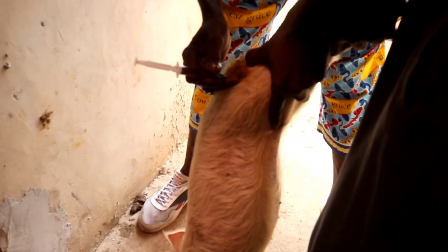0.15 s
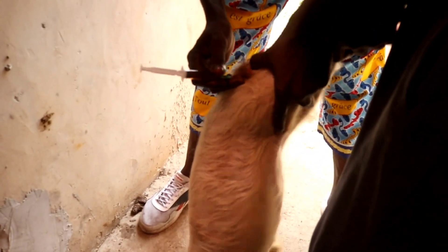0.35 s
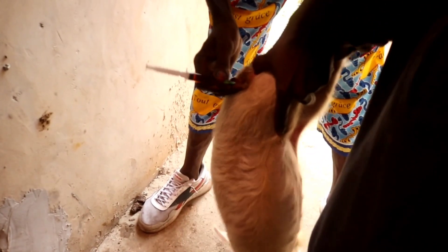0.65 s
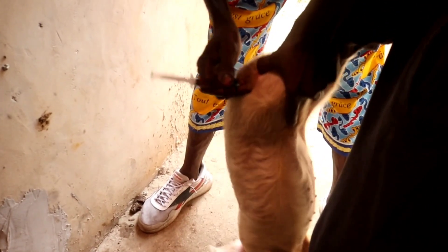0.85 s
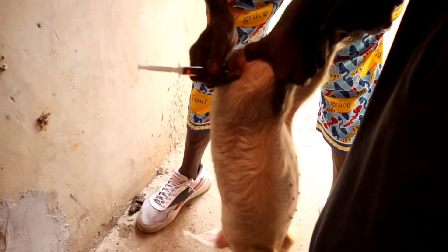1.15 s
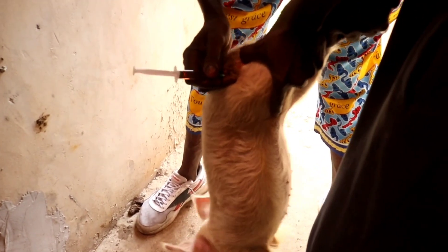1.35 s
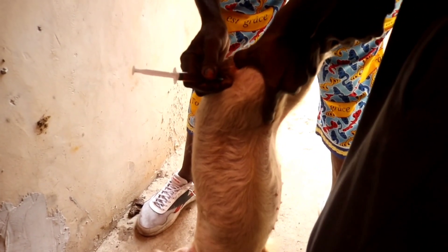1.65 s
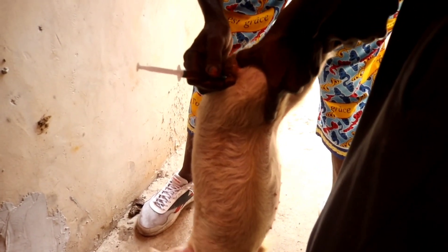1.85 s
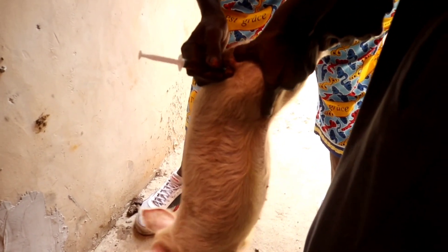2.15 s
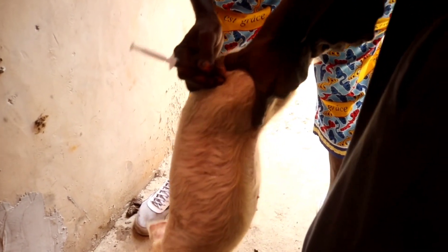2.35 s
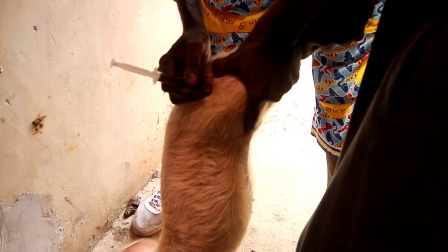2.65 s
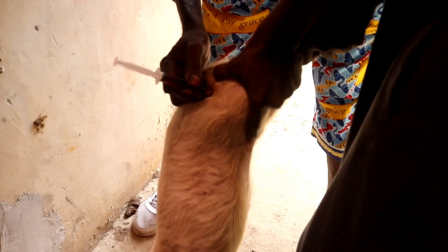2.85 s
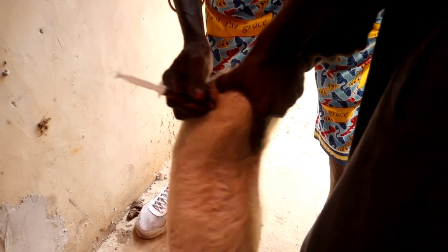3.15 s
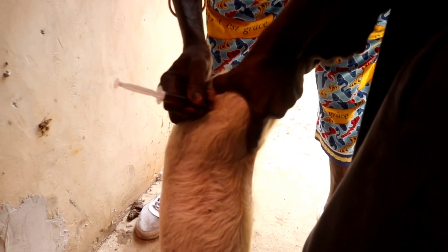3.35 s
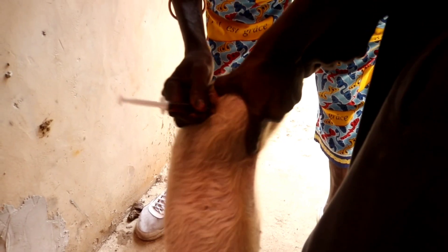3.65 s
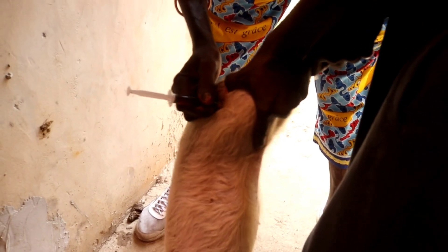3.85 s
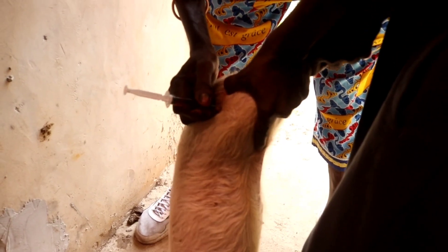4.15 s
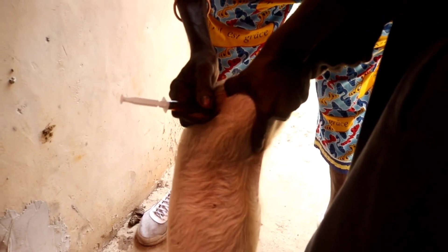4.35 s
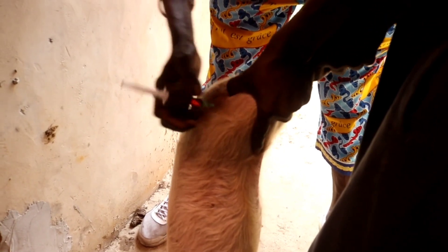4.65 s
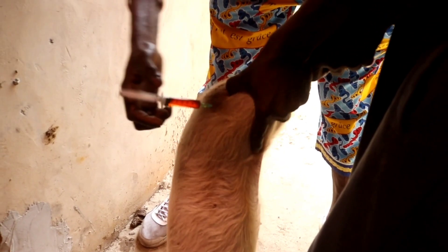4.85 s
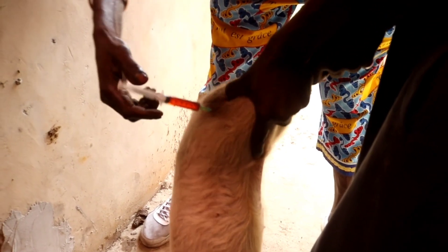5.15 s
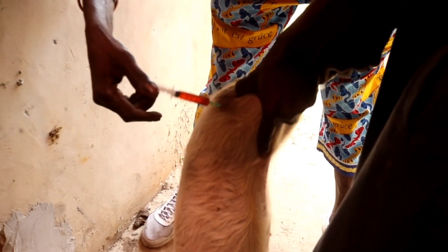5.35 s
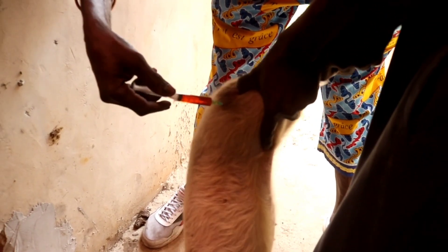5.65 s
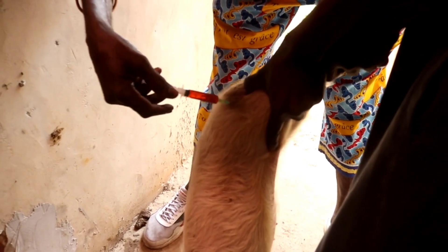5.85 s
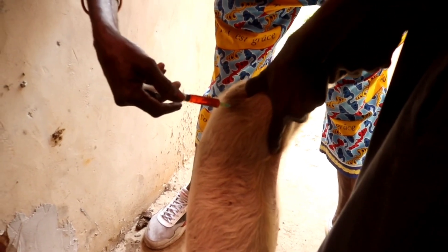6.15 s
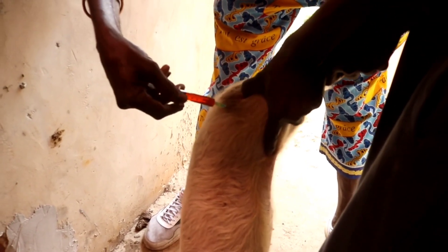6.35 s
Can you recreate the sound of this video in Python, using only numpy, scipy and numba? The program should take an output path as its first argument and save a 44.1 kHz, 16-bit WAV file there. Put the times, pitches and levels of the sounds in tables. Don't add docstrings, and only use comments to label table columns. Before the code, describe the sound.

A piglet is held close to a stereo microphone in a hard, ringing concrete pen with a faint low background. From 0.1 s it barks about four or five times a second, each call roughly a tenth of a second long, raspy with audible throat pulses and opening from a tight mouth to a nasal vowel. Between 0.3 and 1.1 s the calls break into harsh, whistling shrieks that overload and clip. Other pigs answer from further off with dull, rough grunts between calls until about 2.3 s, then only sparsely and faintly. From 1.3 to 3.8 s the barks stay regular but less shrill, slowly spacing out. A soft rising moan comes near 4 s. After that the barks are lower, creakier and about 0.3 to 0.5 s apart. The last, at 6.1 s, trails into a weak falling moan and wall reverberation.

```python
import sys
import numpy as np
from scipy import signal
from scipy.io import wavfile
from scipy.ndimage import uniform_filter1d
from numba import njit

SR = 44100
rng = np.random.default_rng(int(sys.argv[2]) if len(sys.argv) > 2 else 0)


def convert_level_to_amplitude(level_db):
    exponent = np.asarray(level_db, float) / 20
    return 10 ** exponent


def master_out(mix):
    frames = np.transpose(np.atleast_2d(mix))
    ceiling = np.clip(frames, -1, 1)
    pcm = np.round(ceiling * 32767).astype(np.int16)
    wavfile.write(sys.argv[1], SR, pcm)


N = 287077

# (first firm pulse [s], length [s], fastest pulse rate [Hz], push [dB], brightness [dB])
BARK_CALLS = [(0.1228, 0.076, 96, -9.5, -13.5), (0.3289, 0.11, 100, -6, -6.5),
              (0.5454, 0.09, 112, -7, -11.5), (.7733, 0.12, 100, -10, -13.5),
              (1.0202, 0.092, 95, -9.5, -17), (1.2747, 0.087, 92, -11.5, -17),
              (1.5395, .07, 100.7, -9.5, -20), (1.8324, 0.087, 97, -9.5, -17),
              (2.099, 0.088, 88, -14, -15.5), (2.3474, .082, 93, -12, -18.5), (2.6575, 0.082, 85, -11, -18),
              (2.941, 0.087, 97, -11, -17.5), (3.185, .1, 91, -9, -25), (3.502, 0.079, 84, -7, -21),
              (3.7258, .083, 94, -12.5, -25.5), (4.159, 0.095, 79, -13, -10),
              (4.6224, 0.073, 78, -11.5, -16.5), (5.007, 0.059, 77, -14.5, -25),
              (5.3088, 0.083, 72.5, -10.5, -19), (5.634, 0.061, 70.5, -14.5, -14),
              (6.134, 0.092, 69, -12.5, -17.5)]
# (faint leak before it [dB], first pulse [dB], mouth already open [0-1])
BARK_ONSETS = [(-15, -9.5, 0.47), (-22, -9.5, .5), (-58, -5.5, 0.5), (-55, -8, 0.19), (-62, -8.5, .3),
               (-60, -7, 0.12), (-12, -1, .4), (-60, -3.5, 0.76), (-60, -2, 0), (-60, -7, .1),
               (-16.5, -5.5, 0), (-11.5, -3, 0.67), (-60, -7, 0.25), (-64, -8.5, 0.16), (-60, -3.5, 0),
               (-58, -10, 0), (-25, -10.5, 0.06), (-20, -7, 0.09), (-60, -13, 0.14), (-16.5, -8, 0.32),
               (-29.5, -7.5, 0.06)]


def at_hz(points, hz):
    table_hz, values = np.transpose(points)
    return np.interp(np.log(hz + 1), np.log(table_hz + 1), values)


def rms_one(x):
    return x / np.sqrt(np.mean(x ** 2) + 1e-20)


def butter(x, hz, kind, order=2):
    return signal.sosfilt(signal.butter(order, hz, kind, fs=SR, output="sos"), x)


@njit
def ring(x, hz, width_hz):
    out = np.zeros(len(x))
    decay = np.exp(-np.pi * width_hz / SR)
    for i in range(2, len(x)):
        w = 2 * np.pi * hz[i] / SR
        out[i] = np.sin(w) * x[i - 1] + 2 * decay * np.cos(w) * out[i - 1] - decay * decay * out[i - 2]
    return out


def stereo_bands(length, shape):
    # (frequency [Hz], left-right likeness [-1 to 1])
    port_likeness = [(60, 0.94), (240, 1), (950, 0.43), (3770, -0.32), (15000, 0.16)]
    out = 0
    edges = 35 * 2 ** np.arange(0, 9.1, .5)
    white = rng.standard_normal((2, 2, length))
    for k, (low, high) in enumerate(zip(edges, edges[1:])):
        band = signal.butter(2, [low, high], "band", fs=SR, output="sos")
        mid, side = signal.sosfilt(band, white[k % 2])
        hz = np.sqrt(low * high)
        alike = np.clip(at_hz(port_likeness, hz), -.9, .95)
        stereo = np.sqrt(1 + alike) * mid + np.sqrt(1 - alike) * side * [[1], [-1]]
        out = out + shape(hz) * stereo
    return out


def faint_floor():
    # (frequency [Hz], density [dB per Hz])
    floor_spectrum = [(30, -30.5), (109, -0.5), (164, -34), (728, -18.5), (3070, -18.5), (7000, -29.5),
                      (14000, -40.5)]
    return convert_level_to_amplitude(-58) * rms_one(stereo_bands(N, lambda hz: convert_level_to_amplitude(at_hz(floor_spectrum, hz))))


def walls(x):
    # (frequency [Hz], t60 [s])
    wall_decay = [(100, 0.43), (400, 1), (1000, 0.78), (2800, 0.73), (7000, 0.52), (14000, 0.1)]
    t = np.arange(SR) / SR
    build = 1 - np.exp(-(t / .016) ** 2)
    build *= 1 + 3.4 * np.exp(-t / 0.018)
    tail = build * stereo_bands(SR, lambda hz: convert_level_to_amplitude(-60 * t / at_hz(wall_decay, hz)))
    tail /= np.sqrt(np.sum(tail ** 2, axis=1, keepdims=True))
    return signal.fftconvolve(x[None], tail, axes=1)[:, :N]


def nearby(x, lag_ms, left_db):
    # (delay at left port [ms], delay at right port [ms], level [dB])
    early_bounces = [
        (0.248, .6, -19),
        (1.3, 1.9, -15.5),
        (4.4, 3.5, -6.5),
    ]
    reply = np.zeros((2, 1024))
    reply[0, 0] = convert_level_to_amplitude(left_db)
    reply[1, int(lag_ms * SR / 1000)] = 1
    for left_ms, right_ms, db in early_bounces:
        reply[0, int(left_ms * SR / 1000)] += convert_level_to_amplitude(db)
        reply[1, int(right_ms * SR / 1000)] += convert_level_to_amplitude(db)
    return signal.fftconvolve(x[None], reply, axes=1)[:, :N]


def pulse_train(start, length, first, middle, last, jitter_db):
    u = np.arange(int(length * SR)) / (length * SR)
    rate = np.polyval(np.polyfit([0, .5, 1], [first, middle, last], deg=2), u)
    cycles = np.cumsum(rate) / SR
    at = np.flatnonzero(np.diff(np.floor(cycles), prepend=-1))
    clicks = np.zeros(N)
    clicks[int(start * SR) + at] = convert_level_to_amplitude(jitter_db * rng.standard_normal(40)[:len(at)])
    return clicks


def puffed(clicks, puff_db, puff_ms):
    fade = signal.lfilter([1], [1, -np.exp(-1000 / (puff_ms * SR))], clicks + 1e-18)
    return clicks + convert_level_to_amplitude(puff_db) * fade * rng.standard_normal(N)


def chest_ring(clicks):
    # (centre [Hz], width [Hz], level [dB])
    body_modes = [
        (141.6, 23, -6.5),
        (199, 94, 0.5),
        (338, 86, 0),
    ]
    soft = butter(butter(clicks, 320, "low"), 138, "high", order=3)
    return sum(convert_level_to_amplitude(db) * ring(soft, hz + 0 * soft, float(width)) for hz, width, db in body_modes)


def herd():
    # (start [s], length
    # [s], level [dB], low resonance [Hz], high resonance [Hz])
    grunts = [(0.0, 0.024, -33, 753, 2600), (0.494, 0.17, -30.5, 720, 2750), (.66, 0.048, -28, 738, 2600),
              (0.921, 0.053, -29, 690, 2010), (1.164, 0.24, -29.5, 680, 2070),
              (1.411, 0.23, -33, 700, 2360), (1.705, 0.17, -29.5, 637, 2130),
              (1.975, 0.02, -27.5, 660, 2310), (2.23, 0.18, -47.5, 662, 1480), (3.945, .10, -34, 656, 1080),
              (4.571, 0.024, -46, 300, 945), (4.964, 0.088, -39.5, 295, 902),
              (6.239, 0.13, -41, 284.4, 1000)]
    out, chest = np.zeros((2, N))
    for start, length, db, low_hz, high_hz in grunts:
        rate = low_hz / 4.5
        i, span = int(start * SR), int((length + .03) * SR)
        clicks = pulse_train(start, length, rate, rate * 1.05, rate * .95, jitter_db=2)
        part = puffed(clicks, puff_db=-8, puff_ms=9.3)[i:i + span]
        part = part * convert_level_to_amplitude(db) * np.sin(np.pi * np.linspace(.22, .95, len(part)))
        low_ring = ring(part, low_hz + 0 * part, 220.0)
        high_ring = convert_level_to_amplitude(1.0) * ring(part, high_hz + 0 * part, 0.29 * high_hz)
        out[i:i + span] += butter(low_ring + high_ring, low_hz, "high", order=3)
        chest[i:i + span] += part
    return out + convert_level_to_amplitude(-23.5) * chest_ring(chest)


def whistles():
    # (start [s], end [s], first pitch [Hz], last pitch [Hz], level [dB])
    strained = [
        (.36, .445, 4200, 4610, -10),
        (.385, .44, 3020, 3050, -13),
        (.342, .375, 1450, 1600, -15),
        (.355, .39, 5200, 7200, -22),
        (.57, .645, 1480, 1740, -14),
        (.825, .865, 6800, 6880, -23),
        (.78, .875, 640, 715, -16),
        (.815, .865, 3400, 4050, -18),
        (1.03, 1.085, 2450, 2400, -18),
    ]
    # (start [s], end [s], first pitch
    # [Hz], last pitch [Hz], level [dB])
    soft_moans = [
        (3.96, 4.08, 950, 1230, -39),
        (6.2, 6.4, 350, 285, -41),
        (6.245, 6.39, 810, 720, -41),
    ]
    t, out = np.arange(N) / SR, np.zeros(N)
    pitch_waver, level_waver = rms_one(butter(rng.standard_normal((2, N)), 98, "low"))
    for start, end, first_hz, last_hz, db in [*strained, *soft_moans]:
        u = np.clip((t - start) / (end - start), 0, 1)
        glide = 1 - (1 - u) ** 2.5
        hz = (first_hz + (last_hz - first_hz) * glide) * (1 + .004 * pitch_waver)
        swell = np.sqrt(np.sin(np.pi * u) + 1e-9)
        out += convert_level_to_amplitude(db + 3.4 * level_waver) * swell * np.sin(2 * np.pi * np.cumsum(hz) / SR)
    return out


def throat(t):
    # (centre [Hz], level against the first [dB])
    shut_mouth = [(640, -1.5), (1360, -1), (2450, -9.5), (3350, -9), (4400, -7)]
    # (first, second, third, fourth, fifth resonance [Hz])
    open_vowels = [(740, 1600, 2800, 2700, 4250), (795, 1580, 2760, 3050, 4200),
                   (789, 1700, 2680, 3440, 4000), (722, 1840, 2800, 3490, 4080),
                   (752, 1550, 2800, 3050, 3850), (690, 1680, 2800, 3100, 4050),
                   (766, 1610, 2600, 3230, 4140), (726, 1490, 2500, 3050, 4310),
                   (684, 1600, 2850, 3400, 4700), (729, 1480, 2750, 3000, 4250),
                   (680, 1640, 2820, 3100, 4420), (720, 1500, 2800, 3200, 4330),
                   (749, 1680, 2760, 3200, 4330), (705, 1550, 2530, 3080, 4560),
                   (776, 1610, 2860, 2600, 4400), (750, 1600, 2600, 3200, 4430),
                   (700, 1520, 2660, 3050, 4660), (675, 1620, 2700, 3200, 4340),
                   (722, 1570, 3200, 3100, 4541), (776, 1470, 1880, 3080, 4660),
                   (780, 1470, 2050, 2880, 4400)]
    # (second, third, fourth, fifth resonance against the first [dB])
    open_ringing = [(-5.5, 3.5, 4.5, -11.5), (-7, -4, 2.5, -11), (-3, -2.5, -2, -16), (-2, -1.5, -6, -14.5),
                    (-3, -0.5, -1, -5.5), (0.5, 5.8, 4.5, -5.5), (-8, -2.5, -4, -8.5),
                    (-5, -5.5, -2, -10.5), (1.5, 7.5, 6.5, -5), (-2.5, -1, -2, -11), (-11, 4.7, 0, -20),
                    (-5.5, 0.5, -1, -14), (-10, -12.5, -7.5, -19), (-11, -5, -7, -19.5), (-5, -3, 0, -12.5),
                    (-7, -2, 2.5, -10), (-8.5, -1.5, -4, -7), (-10.5, -1, 0, -1.5), (-7.5, 1, -3.5, -14),
                    (-7, -6.5, 1, -12.5), (-12.5, -11.5, -7.5, -17)]
    opening_shares = (0.2, 0.97)
    times, shapes = [], []
    for bark, onset, centres, levels in zip(BARK_CALLS, BARK_ONSETS, open_vowels, open_ringing):
        start, length, ajar = bark[0], bark[1], onset[2]
        shut = np.array(shut_mouth, float)
        opened = np.transpose([centres, (0, *levels)])
        shut[0, 0] = centres[0] / 1.141
        shut[2, 0] = min(shut[2, 0], centres[2])
        times += [start + length * share for share in opening_shares]
        shapes += [shut + np.clip(ajar, 0, 1) * (opened - shut), opened]
    return [[np.interp(t, times, course) for course in part] for part in np.transpose(shapes)]


def folds(t):
    # (share of its length, push [dB], brightness [dB])
    bark_course = [
        (0, 0, -4),
        (.25, -3.5, -9.5),
        (.6, 0.0, 2),
        (.85, -1, -2),
        (1, -11.5, -10.5),
    ]
    # (full [s], end [s], level [dB])
    fold_breaks = [(0.367, 0.421, -8.5), (0.587, 0.627, -9.5), (0.823, 0.855, -6.5), (1.07, 1.097, -12.5),
                   (1.311, 1.332, -10.5), (1.6, 1.57, -13.5), (1.9, 1.924, -21.5), (2.162, 2.163, -19.5),
                   (2.412, 2.439, -22.5), (3.235, 3.246, -12), (3.575, 3.602, -15.5), (3.79, 3.8, -18.5)]
    # (first, last) [dB]
    breath_range = (-30, -17)
    pulses, chest, shriek, bright = np.zeros((4, N))
    share, push_course, shine_course = np.array(bark_course, float).T
    for (start, length, rate, push_db, bright_db), (leak_db, first_db, _) in zip(BARK_CALLS, BARK_ONSETS):
        end = start + length
        push_course[0] = first_db
        breath_db = np.interp(t, [start, end], breath_range)
        push = convert_level_to_amplitude(push_db + np.interp(t, start + length * share, push_course))
        shine_db = np.interp(t, start + length * share, shine_course)
        clicks = pulse_train(start, length, .82 * rate, rate, .85 * rate, jitter_db=1.5) * push
        clicks[int((start - 1.25 / rate) * SR)] = convert_level_to_amplitude(push_db + leak_db)
        pulses += clicks
        chest += clicks * convert_level_to_amplitude(-21 - 0.054 * (rate - 86))
        gate = np.clip(np.minimum(t - start, end + 0.0051 - t) / 0.0038, 0, 1)
        shriek += gate * push * convert_level_to_amplitude(breath_db)
        bright += convert_level_to_amplitude(bright_db + shine_db) * (t > start - .03) * (t < end + .04)
    break_db_per_s, ease_db_per_s = 903, 706
    for full, end, db in fold_breaks:
        rise_db = break_db_per_s * np.maximum(full - t, 0)
        fall_db = ease_db_per_s * np.maximum(t - end, 0)
        shriek += convert_level_to_amplitude(db - rise_db - fall_db)
    lumps = convert_level_to_amplitude(1.3 * rms_one(butter(rng.standard_normal(N), 150, "low")))
    shriek *= lumps * rng.standard_normal(N)
    return puffed(pulses, puff_db=-14, puff_ms=2.6), chest, shriek, bright


def mouth(t, pulses, shriek):
    pulse_widths = np.array([65, 160, 240, 290, 420])
    shriek_widths = np.array([80, 120, 170, 170, 200])
    voice = np.zeros(N)
    signs = (1, -1, -1, 1, -1)
    for k, (hz, level_db) in enumerate(zip(*throat(t))):
        wide = (pulse_widths[k] + 150) / 215
        steady = np.sqrt(shriek_widths[k] / SR)
        rung = convert_level_to_amplitude(-6.0) * wide * ring(pulses, hz, float(pulse_widths[k]))
        rung += np.sqrt(wide) * steady * ring(shriek, hz, float(shriek_widths[k]))
        voice += signs[k] * convert_level_to_amplitude(level_db) * rung
    voice += convert_level_to_amplitude(-13) * ring(pulses + 0.17 * shriek, 2000 + 0 * t, 400.)
    return butter(butter(voice, 521, "high", order=4), 13000, "low")


def piglet():
    t = np.arange(N) / SR
    pulses, chest, shriek, bright = folds(t)
    edge = butter(convert_level_to_amplitude(19.0) * pulses + convert_level_to_amplitude(14.5) * shriek, 5160, "low")
    edge = butter(edge, 4900, "high", order=3)
    return mouth(t, pulses, shriek) + whistles() + bright * edge + convert_level_to_amplitude(4.5) * chest_ring(chest)


def scene():
    near, far = piglet(), herd()
    direct = nearby(near + convert_level_to_amplitude(-7.5) * far, lag_ms=.025, left_db=-1.3)
    return direct + walls(convert_level_to_amplitude(-7) * near + convert_level_to_amplitude(-7.0) * far) + faint_floor()


def band_limit(x):
    return signal.sosfilt(signal.butter(12, 16650, fs=SR, output="sos"), x)


def record(dry):
    dry = butter(dry, 45, "high")
    level_db = 20 * np.log10(uniform_filter1d(np.abs(dry).max(axis=0), size=88) + 1e-6)
    fall_db = 150 * np.arange(N) / SR
    held_db = np.maximum.accumulate(level_db + fall_db) - fall_db
    over_db = np.maximum(held_db + 11, 0)
    dry = dry * convert_level_to_amplitude(-.6 * signal.lfilter([.01], [1, -.99], over_db))
    top = np.where(dry > 0, .52, .49)
    held = dry / (1 + np.abs(dry / top) ** 6) ** (1 / 6)
    return band_limit(held)


dry = scene()
out = record(dry)
master_out(out)
```